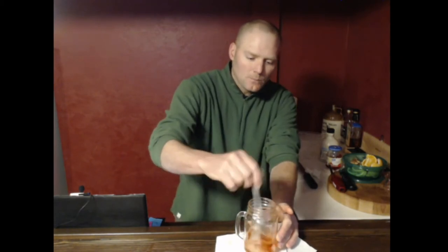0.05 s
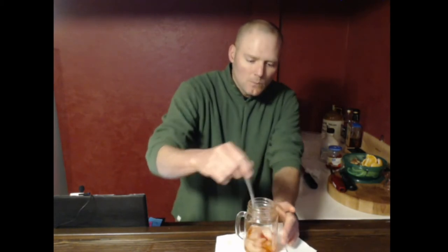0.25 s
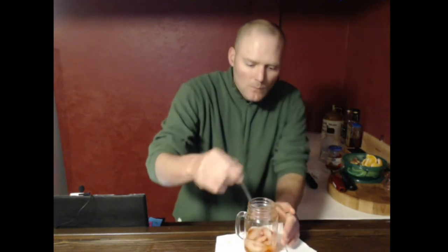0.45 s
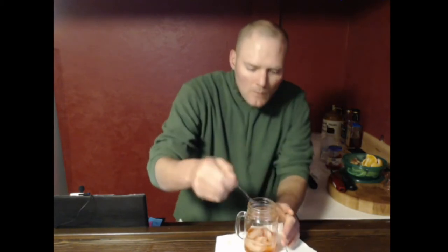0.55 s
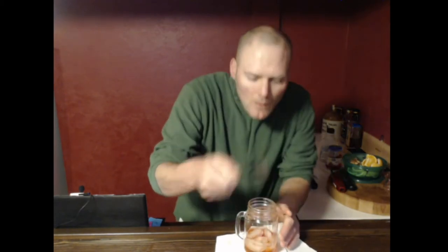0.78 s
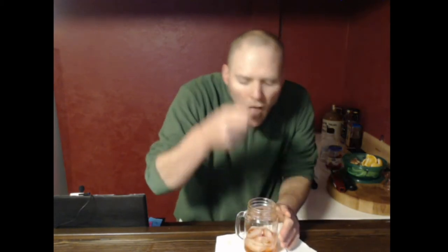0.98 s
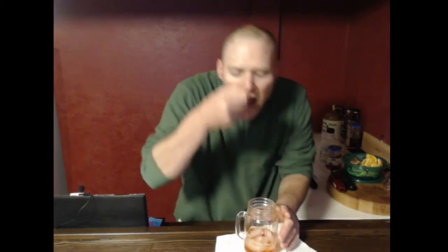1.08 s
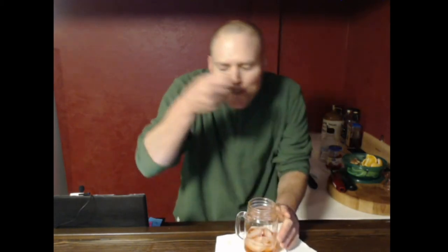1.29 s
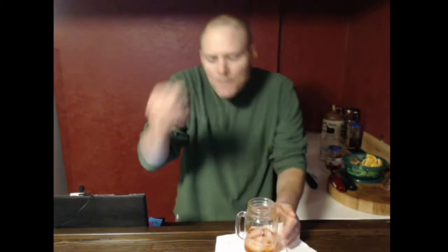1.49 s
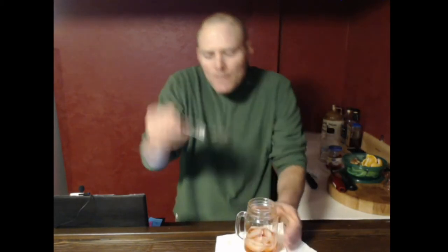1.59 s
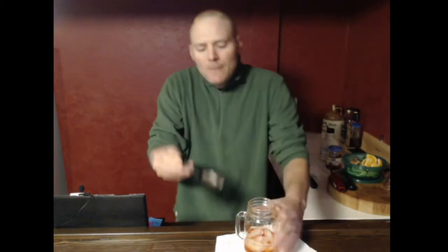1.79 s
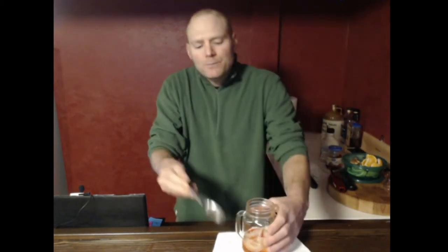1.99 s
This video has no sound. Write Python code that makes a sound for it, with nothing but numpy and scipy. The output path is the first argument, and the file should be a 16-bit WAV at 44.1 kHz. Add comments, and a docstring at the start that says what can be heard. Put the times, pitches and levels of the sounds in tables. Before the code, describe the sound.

A metal spoon clinks and scrapes brightly in a glass mug, then lifts out with a plop

```python
"""A bright clink and a scrape: a metal spoon stirs a drink in a glass mug, then lifts out with a plop.
The drink heaves softly, lips smack after the taste, and the spoon touches the glass again, lightly.
Glass, mug and plops are damped sines; scrape, smacks and slosh are shaped noise, over a small humming room.
A narrow-band microphone with a fast limiter and soft clipping holds down the hardest peaks."""
import sys
import numpy as np
from scipy import signal
from scipy.fft import rfft, irfft, next_fast_len
from scipy.io import wavfile

SR = 44100
rng = np.random.default_rng(int(sys.argv[2]) if len(sys.argv) > 2 else 0)


def transcribe(u):
    """Save the signal u as a 16-bit wav file named by the first command-line argument.

    u: samples, shape (n,) or (channels, n), limited to [-1, 1]; the rate is SR.
    q: integer samples, one column per channel.
    """
    v = np.clip(np.atleast_2d(u).T, -1, 1)
    q = np.round(v * 32767).astype(np.int16)
    wavfile.write(sys.argv[1], SR, q)


N = 90404
T = np.arange(N) / SR  # s


def amp(db):
    """Decibels to gain."""
    return 10 ** (np.asarray(db) / 20)


def unit(x):
    """Scaled to rms 1."""
    return x / np.sqrt(np.mean(x ** 2) + 1e-20)


def along(points, hz):
    """Read a curve of (Hz, value) points on a log frequency axis."""
    point_hz, values = np.transpose(points)
    return np.interp(np.log(hz + 1), np.log(point_hz + 1), values)


def filtered(x, response):
    """x shaped by a function of frequency, padded so that tails do not wrap round."""
    size = next_fast_len(N + SR // 2)
    spectrum = rfft(x, size) * response(np.fft.rfftfreq(size, 1 / SR))
    return irfft(spectrum, size)[..., :N]


def noise(colour):
    """Coloured noise of rms 1."""
    white = rng.standard_normal(N)
    return unit(filtered(white, lambda hz: amp(along(colour, hz))))


def fade(t60, rise=0.00072):
    """A quick rise (time constant in s) times an exponential decay (60 dB in t60 s)."""
    return amp(-60 * T / t60) * (1 - np.exp(-T / rise))


WAVER, WAVER_PER_S = .0035, 106  # random detuning as a share of pitch; new values per second


def ring(modes, scatter_db=0):
    """Damped sines that the swirling drink detunes together; scatter varies their levels at each blow."""
    knots = rng.standard_normal(size=1024)
    drift = np.interp(T * WAVER_PER_S, np.arange(len(knots)), knots)
    clock = T + WAVER * np.cumsum(drift) / SR
    out = np.zeros(N)
    for hz, db, t60 in modes:
        level = amp(db + scatter_db * rng.standard_normal())
        out += level * np.sin(2 * np.pi * hz * clock) * fade(t60)
    return out


def add(track, s, sound):
    """Mix a sound in at time s."""
    start = max(0, round(s * SR))
    track[start:start + len(sound)] += sound[:N - start]


# how long the room rings: pitch_hz, t60_s
ROOM_T60 = [(200, 0.55), (700, 0.39), (3000, 0.38), (7000, 0.34)]
WALLS_T60, WALLS_DB, ROOM_DB = 0.071, -7, -12.5  # s; echo levels against the dry sound


def in_room(x):
    """The sound plus freshly drawn noise echoes: short from the near walls, longer from the room."""
    hz, t, grains = signal.stft(rng.standard_normal(SR // 2), SR, nperseg=256)
    decay = amp(-60 * t / along(ROOM_T60, hz)[:, None])
    tail = signal.istft(grains * decay, SR, nperseg=256)[1][:SR // 2]
    tail *= 1 - np.exp(-T[:len(tail)] / .01)
    walls = (rng.standard_normal(N) * fade(WALLS_T60, rise=0.003))[:len(tail)]
    room_echo = amp(ROOM_DB) * tail / np.linalg.norm(tail)
    wall_echo = amp(WALLS_DB) * walls / np.linalg.norm(walls)
    return x + signal.fftconvolve(x, room_echo + wall_echo)[:N]


# spoon on glass; the spot struck decides what rings, and a spoon left leaning damps it:
# start_s, rim_db, twin_db, overtones_db, tilt_db_per_octave, crack_db, hollow_knock_db, rim_t60_s
CLINKS = [(0.0, -4, -25, -30, 0, -25, -58, 0.019), (0.039, -22.5, -23, -54.5, -6, -40, -73, 0.093),
          (.053, -10, -37, -42, 0, -34, -52, 0.078), (.0604, -6.5, -2.5, -34.5, -10, -12.5, -38, 0.088),
          (.1725, -23.5, -35, -43, -3, -42, -45, 0.066), (0.2143, -2, -17, -15.5, -1.5, -8.5, -22, 0.066),
          (0.369, -47, -31, -49, 7.5, -24.5, -32, .1), (.4232, -23.5, -25, -27.5, 11.5, -21, -33.5, 0.25),
          (.556, -41.5, -60, -65, 5, -46, -57, .25), (.607, -41.5, -63, -56, 4, -66, -74, 0.17),
          (1.839, -41, -65, -82, 0, -60, -66, 0.071), (1.887, -39, -68, -70, -10, -74, -76, 0.073),
          (1.947, -25, -42.5, -49, -6, -37.5, -54, 0.072), (2.018, -24, -40, -40, 7.5, -38.5, -45, 0.082)]
# higher and lesser modes of mug and spoon: pitch_hz, relative_db, t60_s
OVERTONES = [(2440, -5.5, 0.16), (2731, -2, 0.083), (3295, -12, 0.22), (3416, -7.5, 0.13),
             (3787, -6, 0.054), (3914, -6.5, 0.076), (4857, -3.5, 0.068), (5676, -4.5, 0.12),
             (6070, -6, 0.089), (6200, -18.5, 0.27), (6735, -22.5, 0.12)]
# the hollow of the mug: pitch_hz, relative_db, t60_s
HOLLOW = [(173, -14, .25), (364, -22.5, 0.22), (642.4, 0.5, 0.18), (963, -1, 0.045)]
# colour of the contact noise: pitch_hz, relative_db
CRACK = [(60, -18), (150, 2.5), (500, -3), (1000, 1.5), (1900, -1.5), (3000, -4.5), (6000, -3.5),
         (9000, -7)]
RIM_HZ, TWIN_HZ, TWIN_T60 = 2871, 3144.5, .11  # the two main glass tones; s
TILT_PIVOT_HZ = 4000  # the overtone tilt leaves this pitch unchanged
CRACK_T60, RATTLE_DB, RATTLE_T60 = 0.033, -22, 0.13  # s; rattle level against the crack; s


def clinks():
    """Each contact cracks, rattles briefly, rings the glass and knocks the hollow of the mug."""
    out = np.zeros(N)
    crack_shape = fade(CRACK_T60) + amp(RATTLE_DB) * fade(RATTLE_T60)
    for s, rim_db, twin_db, over_db, tilt_db, crack_db, knock_db, t60 in CLINKS:
        rim = ring([(RIM_HZ, rim_db, t60), (TWIN_HZ, twin_db, TWIN_T60)])
        tilted = [(hz, db + over_db + tilt_db * np.log2(hz / TILT_PIVOT_HZ), life)
                  for hz, db, life in OVERTONES]
        upper = ring(tilted, scatter_db=1)
        crack = amp(crack_db) * noise(CRACK) * crack_shape
        knock = amp(knock_db) * ring(HOLLOW, scatter_db=3)
        add(out, s, in_room(rim + upper + crack + knock))
    return out


# the spoon slides along the wall: start_s, length_s, first_level_db, last_level_db
SCRAPES = [(0.0, 0.062, -25, -34), (0.059, 0.061, -17, -39), (0.367, .05, -35, -32),
           (0.424, 0.068, -25, -46)]
# colour of the bare grit: pitch_hz, relative_db
GRIT = [(100, -5.5), (400, -5.5), (1000, -11), (1900, -9.5), (2500, -1), (3300, 6), (4000, 5.5), (5400, -2),
        (7000, -4)]
SLIPS_PER_S, SCRAPE_RELEASE_S = 6000, 0.084  # the release falls to -120 dB
SINGING_DB, SCRAPE_DAMPING = -5.5, 0.38  # modes against grit; share of ring time left under the spoon


def scrapes():
    """Dense tiny slips of steel on wet glass, which also stir the damped modes."""
    slips = rng.standard_normal(N) * (rng.random(N) < SLIPS_PER_S / SR)
    grit = unit(filtered(slips, lambda hz: amp(along(GRIT, hz))))
    damped = ring([(hz, db, t60 * SCRAPE_DAMPING) for hz, db, t60 in OVERTONES])
    singing = unit(signal.fftconvolve(grit, damped)[:N])
    strokes = np.zeros(N)
    for s, length, first_db, last_db in SCRAPES:
        end = s + length
        times = [s - .004, s, end, end + SCRAPE_RELEASE_S]
        strokes += amp(np.interp(T, times, [-120, first_db, last_db, -120]))
    return in_room(unit(grit + amp(SINGING_DB) * singing) * strokes)


# colour of the room noise: pitch_hz, relative_db_per_hz
AIR = [(20, -17), (90, -20.5), (120, -12.5), (150, -7.5), (178, 0), (235, -4.5), (300, -15.5), (600, -18),
       (900, -21.5), (1200, -22), (3000, -24.5), (7000, -26)]
# steady drone of an appliance: pitch_hz, rms_db
HUM = [(119, -61), (170, -53), (239, -52.5), (360, -60.5), (886, -63.5)]
AIR_DB = -41  # rms


def room_tone():
    """An appliance drones as steady sines in even, mostly low room noise."""
    hum = np.zeros(N)
    for hz, db in HUM:
        hum += amp(db) * np.sqrt(2) * np.sin(2 * np.pi * (hz * T + rng.random()))
    return amp(AIR_DB) * noise(AIR) + hum


# pockets of air in the drink: start_s, pitch_hz, level_db, t60_s
PLOPS = [(.122, 353, -31, 0.11), (.377, 360.6, -30, 0.21), (.4225, 589, -10.5, 0.047),
         (.462, 624, -24, 0.074)]


def plops():
    """The drink closes behind the spoon: air pockets sound as soft, low damped sines."""
    out = np.zeros(N)
    for s, hz, db, t60 in PLOPS:
        add(out, s, amp(db) * np.sin(2 * np.pi * hz * T) * fade(t60, rise=0.0042))
    return in_room(out)


# low swells as the drink heaves and settles: start_s, level_db
SLOSHES = [(.37, -27), (.83, -39)]
# colour of the swells: pitch_hz, relative_db
SLOSH = [(60, -28.5), (140, -3), (240, 3), (320, -3), (440, -2.5), (520, -17), (900, -29.5), (2000, -40)]


def slosh():
    """The drink heaves as the spoon is lifted: low noise swells and settles quickly."""
    out = np.zeros(N)
    for s, db in SLOSHES:
        add(out, s, amp(db) * noise(SLOSH) * fade(t60=.5, rise=0.057))
    return out


# lip smacks and small dry ticks, each in one resonance: start_s, centre_hz, width_hz, peak_db
TICKS = [(1.6543, 5500, 2000, -29), (1.663, 1660, 69.6, -36.5), (1.6706, 4440, 1800, -22),
         (1.6761, 5660, 1010, -20), (1.679, 6330, 503, -20), (1.6817, 3900, 400, -23),
         (1.685, 3940, 45, -34), (1.683, 1450, 40, -38), (2, 4060, 61, -34.5), (2.0092, 5500, 1810, -13.5),
         (2.0096, 4080, 50, -18.5), (2.037, 1520, 710, -28)]


def smacks_and_ticks():
    """A short noise burst excites each resonance; the narrow ones ring on."""
    out = np.zeros(N)
    for s, hz, width, db in TICKS:
        burst = rng.standard_normal(N) * fade(t60=0.01)
        tick = filtered(burst, lambda f: 1j * f * width / (hz * hz - f * f + 1j * f * width))
        add(out, s, amp(db) * tick / np.abs(tick).max())
    return in_room(out)


# level of a faint, mostly treble difference between the channels: pitch_hz, side_db
SIDE = [(100, -43), (300, -45), (700, -37), (2800, -30), (4500, -29), (7000, -11.5)]


def scene():
    """Almost mono: a faint, mostly treble difference between the channels follows the sounds."""
    near = clinks() + scrapes() + plops() + slosh() + smacks_and_ticks()
    smeared = in_room(near) - near
    side = filtered(smeared, lambda hz: amp(along(SIDE, hz)))
    mid = near + room_tone()
    return np.array([mid + side, mid - side])


# microphone response: pitch_hz, gain_db
MIC = [(40, -10.5), (80, -10), (120, -0.5), (6500, -1), (7200, -5.5), (7800, -16.5), (8600, -24.5),
       (9200, -50), (10500, -68)]
LIMIT_DB, RELEASE_DB_PER_S, LIMITER_LAG_S = -4.5, 1198, 0.00026
CLIP_DB, CLIP_KNEE = -8.5, 5  # ceiling; a higher knee number bends harder
TOP_HZ = 15900


def record(dry):
    """Narrow-band microphone, fast limiter, soft clipping and a steep top cut."""
    x = filtered(dry, lambda hz: amp(along(MIC, hz)))
    # both channels share one gain, set by the louder
    peak_db = 20 * np.log10(np.abs(x).max(axis=0) + 1e-9)
    over_db = np.maximum(peak_db - LIMIT_DB, 0)
    # the cut holds each peak and then recovers in a straight line of dB
    recovery_db = RELEASE_DB_PER_S * T
    cut_db = np.maximum.accumulate(over_db + recovery_db) - recovery_db
    lagged_db = filtered(cut_db, lambda hz: 1 / (1 + 2j * np.pi * hz * LIMITER_LAG_S))
    x = x * amp(-lagged_db)
    x = x / (1 + np.abs(x / amp(CLIP_DB)) ** CLIP_KNEE) ** (1 / CLIP_KNEE)
    return filtered(x, lambda hz: 1 / np.sqrt(1 + (hz / TOP_HZ) ** 200))


dry = scene()
out = record(dry)
transcribe(out)
```